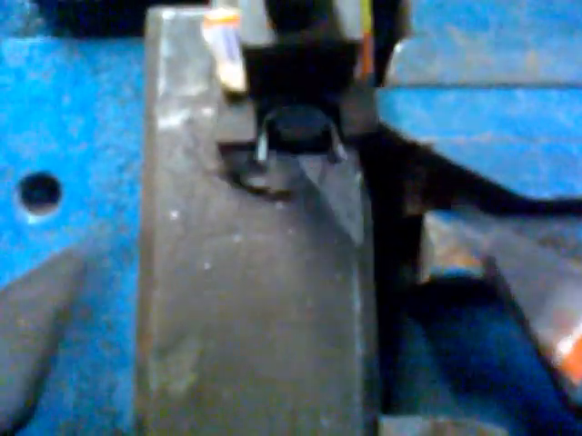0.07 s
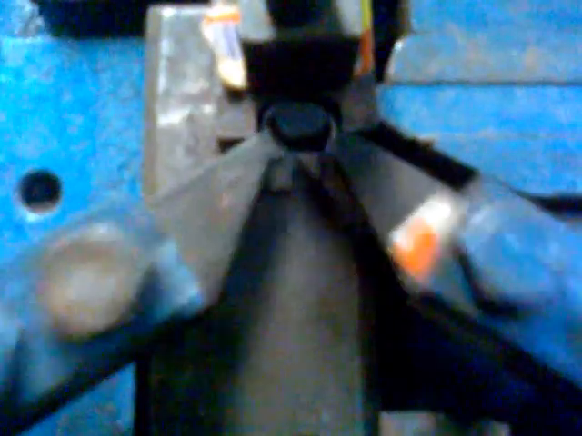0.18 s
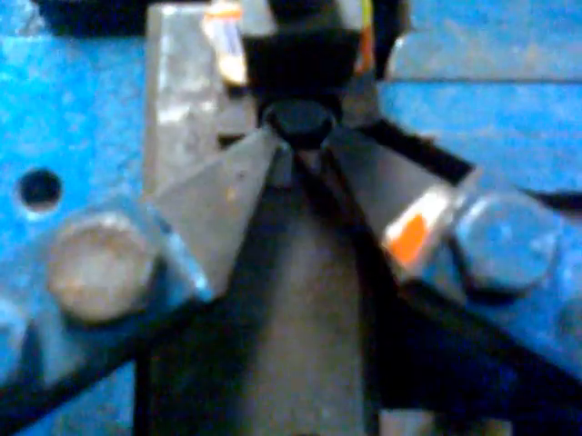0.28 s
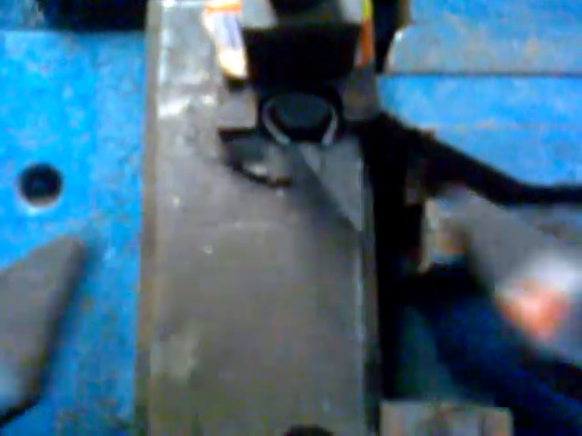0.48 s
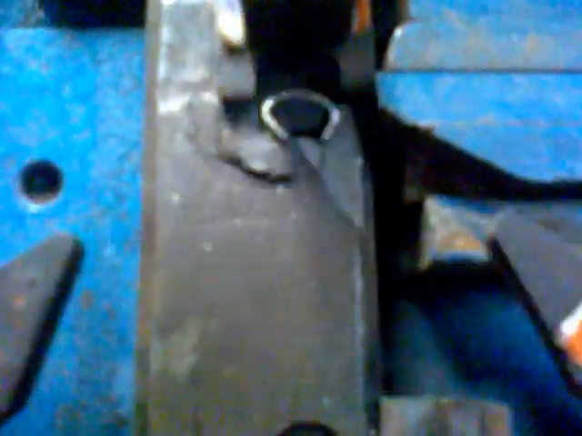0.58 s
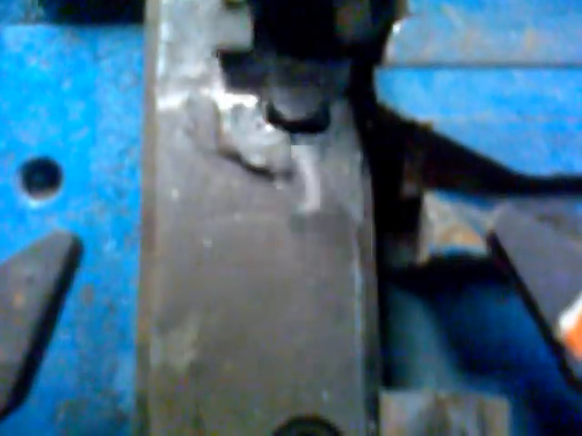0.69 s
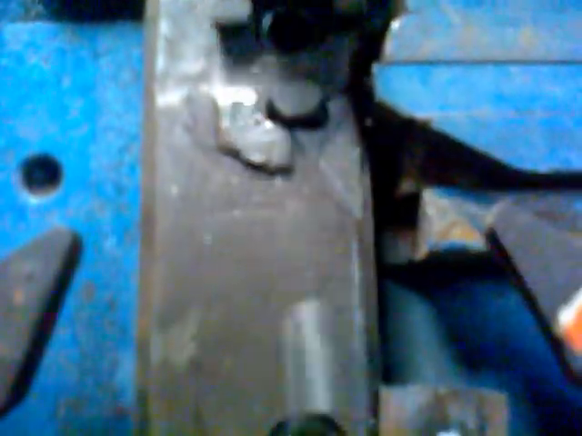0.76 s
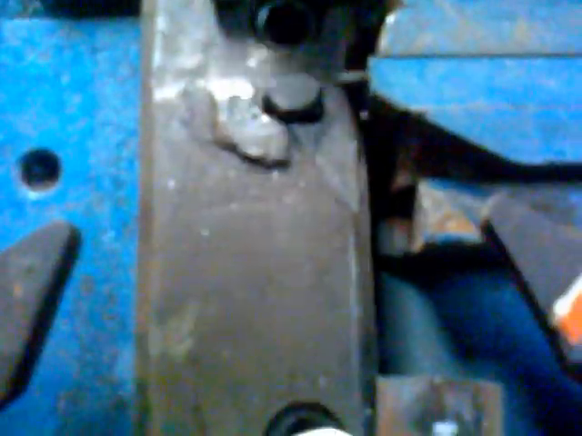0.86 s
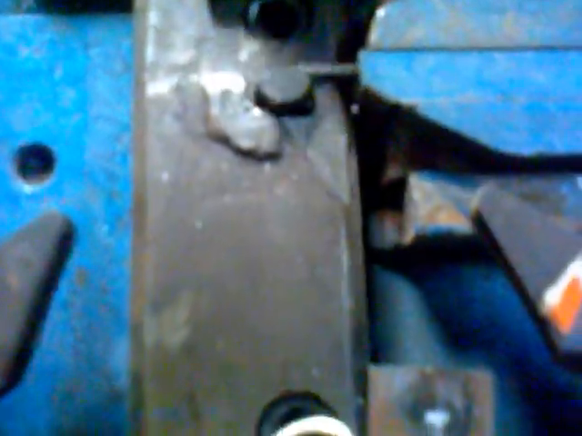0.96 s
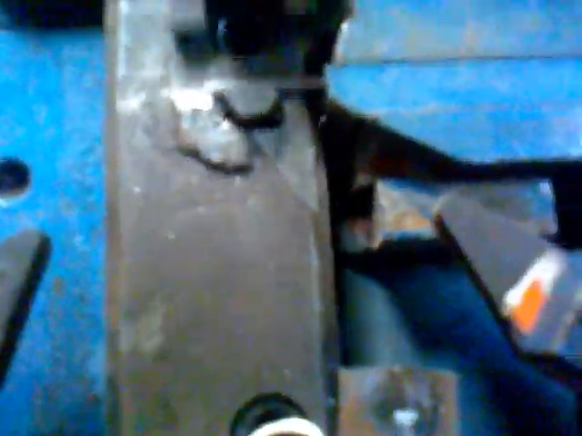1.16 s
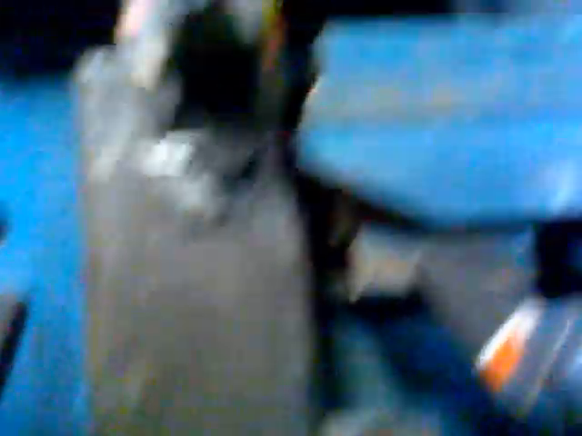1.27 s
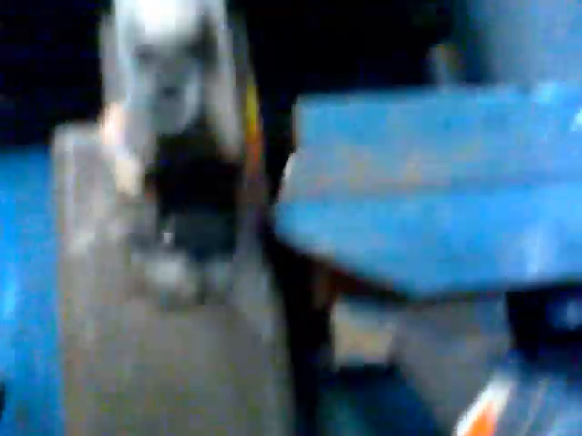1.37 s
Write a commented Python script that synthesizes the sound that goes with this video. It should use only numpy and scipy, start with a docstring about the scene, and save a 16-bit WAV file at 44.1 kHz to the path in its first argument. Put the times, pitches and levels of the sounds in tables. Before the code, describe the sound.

A wire forming machine runs through one cycle, very close: light ticks, a crashing volley of steel clanks, a second clattering volley with short pings, then a faint wire hiss and dull knock in a workshop.

```python
"""In a workshop, very close to a cam-driven wire forming machine, one working cycle is heard.
Steel slides and bending arms clank shut in one volley and let go in a second: bursts of many fading tones.
Small parts ping as paired sine tones, the frame rings in longer ones, and coloured noise is the drive under load.
The wire slides on with a gliding hiss, a dull low knock follows, and the loudest blows overload the microphone."""
import sys
import numpy as np
from scipy import signal
from scipy.fft import rfft, irfft
from scipy.io import wavfile
from scipy.ndimage import uniform_filter1d

SR = 44100
rng = np.random.default_rng(int(sys.argv[2]) if len(sys.argv) > 2 else 0)


def file_out(sig):
    """Save sig as 16-bit WAV at sys.argv[1]."""
    # one column per channel
    cols = np.atleast_2d(sig).T
    # limit, then scale
    lim = np.clip(cols, -1, 1)
    pcm = np.round(lim * 32767).astype(np.int16)
    wavfile.write(sys.argv[1], SR, pcm)


N = 63945  # length in samples

# Noise of the running drive. Each row: frequency in Hz, relative strength in dB per Hz.
DRIVE_COLOUR = [(25, -14.5), (55, -3.5), (90, 1), (150, -8.5), (260, 0.5), (470, -9), (640, -1),
                (800, -8.5), (1500, -9), (2800, -19.5), (4000, -22.5), (7000, -39), (15500, -40.5)]
# How hard the machine works. Each row: time in seconds, change of drive level in dB.
LOAD_CURVE = [(0, -2.5), (.13, -2), (.3, 19.5), (.43, 1), (.5, 11.5), (.56, 7), (.8, 13), (.95, 3.5),
              (1.07, -0.5), (1.16, -3.5), (1.35, -4), (1.45, 4)]
DRIVE_DB, RATTLE_DB = -43.5, 2  # level before the load is added; depth of the random flutter

# Low shaking of the machine's body. Each row: frequency in Hz, relative strength in dB per Hz.
RUMBLE_COLOUR = [(18, -23), (35, -9), (52, 1), (85, -2), (130, -10.5), (300, -44)]
# How strongly the body shakes. Each row: time in seconds, rumble level in dB.
SHAKE_CURVE = [(0, -55), (.15, -56), (.22, -56), (.38, -28), (.47, -39.5), (.65, -44.5), (.78, -42.5),
               (.92, -43.5), (1.15, -58.5), (1.38, -52), (1.42, -43), (1.45, -50)]

# Resonances of the gear housing. Each row: frequency in Hz, width in Hz, level in dB before the load is added.
GEAR_TONES = [(604.7, 36, -49), (677, 55, -49), (1444, 90, -58.5)]
GEAR_LOAD_SHARE = 0.87  # dB of gear level per dB of load

# Sound of a cam follower's tap. Each row: frequency in Hz, relative strength in dB per Hz.
TAP_COLOUR = [(100, -23), (250, -1), (650, 2), (1500, -1.5), (2800, -14.5), (4000, -12.5), (8000, -33.5),
              (16000, -45.5)]
TAPS_PER_S, TAP_DB, TAP_SPREAD_DB, TAP_RING_S = 40, -49.5, 3.5, 0.025  # level before the load is added

# Steel striking steel. Each row: start in seconds, level in dB, then bass, edge and fizz in dB
# relative to that level, and ring time (60 dB fade) in seconds at the second colour frequency.
BLOWS = [ (.036, -34, 0, -1.5, -3, 0.028), (.067, -29, 16, -22, -17, 0.035), (.150, -29, -4, -19, -12, .03),
         (.161, -14, -4, -11.5, -29, 0.021), (0.178, -25.5, 11, -3, 2, 0.06), (.199, -22, 4, 5, 6, 0.046),
         (.206, -2.5, 6.5, 5.5, 8.5, .035), (.276, -8.5, 1, -7.5, -17, 0.063),
         (.2865, -4, 1, -1.5, -11, 0.023), (.289, -1.5, -0.5, 2, 7.5, 0.02),
         (0.311, -13, -3.5, -1, -21.5, .04), (.3142, -11, -2.5, -6, -11, 0.052),
         (0.3308, -4, -3, 0.5, -3.5, 0.044), (.352, -14, 3, 0.5, -22, 0.027),
         (0.3609, -4.5, -14, 1, -14, 0.031), (.3655, -3, -19, 4.5, 6, 0.033),
         (0.3796, -2.5, -2, 6, 1, 0.036), (.389, -11, 2, 5.5, -14, 0.057),
         (.398, -20.5, -7, 13, -7.5, 0.047), (0.496, -23, -0.5, -10, -13, .06),
         (.548, -27, -10, 4, -17, 0.028), (.573, -5, -7, 8, -4, 0.062), (.579, -6.5, 0, 5, 2, 0.021),
         (.588, -9, -7, 7, -3.5, 0.046), (.596, -5, -7.5, 1, -9, 0.043), (.601, -3.5, -1.5, -3, 1, 0.027),
         (.619, -7.5, -4, 10.5, -2.5, 0.049), (.629, -16.5, 1.5, -0.5, -0.5, 0.069),
         (0.653, -19, -10.5, -22, -11, 0.11), (.684, -4.5, -15.5, 2.5, -20, 0.053),
         (0.707, -9, -11, 7, 7.5, .04), (0.7221, -7, -17, 2, -5.5, 0.026), (.732, -4, -13.5, 5.5, 0.5, .05),
         (.740, -5.5, -5.5, 8.5, 0.5, 0.053), (0.789, -22.5, 17, 9.5, 26.5, 0.012),
         (.820, -18, 2, -10, -7, 0.038), (.849, -19, -2, -2.5, 0, 0.034), (0.86, -31, -4, 3.5, 18.5, .05),
         (.889, -27, -12, 8, 7, 0.057), (.963, -24.5, 3.5, -17, -21.5, 0.027),
         (.983, -28.5, 5, -18, -12, 0.034), (1.004, -50, -5, 10, 28.5, 0.17),
         (1.222, -45.5, 7, 8, -6.5, 0.037), (1.408, -35, -1, -0.5, 9, 0.037),
         (1.416, -34.5, 1, 6.5, 12, 0.017), (1.432, -33.5, 1.5, -11, -9, 0.057),
         (1.442, -31.5, 3, 6, 8.5, 0.019)]
# Sound of the steel parts. Each row: frequency in Hz, relative strength in dB per Hz.
STEEL_COLOUR = [(60, -30), (140, -22), (200, -4), (450, -3), (680, -1.5), (1000, 0.5), (1900, 0),
                (2750, -9), (3600, -6.5), (5200, -14), (8000, -22), (11000, -26.5), (16000, -39.5)]
# Where a blow's colour is set. The entries, in Hz: bass, the unchanged middle, edge, fizz.
BLOW_COLOUR_HZ = [220, 1300, 5000, 10000]
ATTACK_S, TREBLE_DAMPING = 0.00026, 0.17  # ring time falls as this power of frequency

# Sound of loose links and pins. Each row: frequency in Hz, relative strength in dB per Hz.
CHATTER_COLOUR = [(200, -13.5), (900, -1), (2000, 3), (2800, 5), (4000, -5), (7000, -11), (11000, -20),
                  (16000, -29)]
CHATTER_PER_S, CHATTER_DB, CHATTER_SPREAD_DB = 260, -16, 3.5  # level relative to the shaking
CHATTER_FADE_S, CHATTER_RING_S = 0.01, 0.014  # memory of the shaking; 60 dB fade of a tick

# Ringing modes of the frame. Each row: frequency in Hz, relative level in dB, 60 dB fade in seconds.
FRAME_MODES = [(219.8, -26.5, 0.16), (544.8, -21.5, .2), (587, -39.5, 0.82), (668.6, -27.5, 0.51),
               (829, -19.5, 0.2), (980, -23, 0.122), (1160, -27.5, 0.23), (1295, -21, 0.14),
               (1489, -25.5, 0.22), (1707, -25, .17), (2033, -20.5, .18), (3387, -29.5, 0.16),
               (3880, -21.5, 0.1), (5020, -33, 0.18)]
FRAME_DB = -3  # added to every mode's level, along with the blow's

# How long the room rings. Each row: frequency in Hz, 60 dB fade in seconds.
ROOM_FADE = [(100, .5), (500, 0.42), (1500, 0.54), (4000, .42), (8000, .36), (15000, 0.39)]
# How strongly the room answers. Each row: frequency in Hz, level in dB.
ROOM_LEVEL = [(100, -9), (600, -11.5), (1500, -18), (4000, -22), (12000, -19)]
PING_ROOM_DB = -0.5  # how much of the pings reaches the room

# Single parts ringing after a blow. Each row: start in seconds, pitch in Hz, level in dB,
# 60 dB fade in seconds, level change at the next contact in dB (only negative values act).
PING_PARTS = [(0.2045, 6330, -25, 0.1, 0), (.207, 967, -6, 0.069, 0), (.208, 218, -19, 0.13, 0),
              (.2865, 860, -7, 0.032, 0), (0.319, 3750, -14, 0.036, 0), (0.331, 6190, -3.5, 0.013, 0),
              (.3715, 3474, 6, 0.025, 1.5), (.573, 5120, -8, 0.043, 0), (.574, 1325, -5, 0.072, 0),
              (.574, 3360, -1.5, 0.029, 0), (.582, 4600, -12, 0.071, 0), (.619, 4820, -5, 0.025, 0),
              (.6375, 3740, -10.5, 0.022, 0), (.684, 6030, -11, 0.026, 0), (0.7056, 3432, 4, 0.072, -11.5),
              (.742, 3490, -10, 0.06, 0), (.742, 5230, -17.5, .06, 0), (.742, 10920, -31, .08, 0),
              (.796, 3430, -14.5, 0.065, 0), (.796, 8340, -25, .05, -2), (1.4415, 2375, -21.5, 0.011, 0)]
PING_RISE_S, TWIN_SHARE, TWIN_DB = 0.0012, 0.021, -10.5  # the weaker twin lies this share below the pitch
PING_FREE_S, PING_CATCH_S = 0.0071, 0.00046  # free ringing before contact; softness of the catch

SLIDE_S, SLIDE_LENGTH_S, SLIDE_DB = 0.991, 0.15, -52.5
SLIDE_FROM_HZ, SLIDE_TO_HZ, SLIDE_WIDTH_HZ = 4800, 3700, 710

KNOCK_S, KNOCK_HZ, KNOCK_DB, KNOCK_SWELL_S = 1.4078, 550, -14, 0.00067  # swell peaks after twice this time

CLIP_KNEE, EDGE_HZ = 4, 15900  # sharpness of the overload; top of the microphone's band


def amp(db):
    """Turns decibels into a gain."""
    return 10 ** (np.asarray(db) / 20)


def evened(x):
    """Scales a signal to an rms (average strength) of one."""
    return x / np.sqrt(np.mean(x ** 2) + 1e-20)


def read(points, hz):
    """Reads a table between its rows, on a log-frequency axis."""
    f, value = np.transpose(points)
    return np.interp(np.log(hz + 1), np.log(f + 1), value)


def curve(points):
    """Reads a table over time at every sample."""
    return np.interp(np.arange(N) / SR, *np.transpose(points))


def add(mix, s, sound):
    """Mixes a sound in, starting at the given second."""
    part = mix[max(round(s * SR), 0):][:len(sound)]
    part += sound[:len(part)]


def noise(spectrum):
    """Makes steady noise of a given colour."""
    gain = amp(read(spectrum, np.fft.rfftfreq(N, 1 / SR)))
    return evened(irfft(rfft(rng.standard_normal(N)) * gain, N))


def dense_ring(gain, t60_of, count=8):
    """Adds up very many modes of random phase, each band dying at its own speed."""
    size = 2 * (len(gain) - 1)
    hz, t = np.fft.rfftfreq(size, 1 / SR), np.arange(size) / SR
    centres = np.geomspace(120, 14000, count)
    modes = gain * np.exp(2j * np.pi * rng.random(len(gain))) * np.sqrt(size)
    ring = np.zeros(size)
    for centre, share in zip(centres, np.eye(count)):
        # Neighbouring bands cross-fade into each other
        band = irfft(modes * read(np.c_[centres, share], hz))
        ring += band * np.exp(-np.log(1000) * t / t60_of(centre))
    return ring


def resonance(hz, width):
    """Makes noise ring in one resonance, at a fixed or gliding frequency."""
    r = np.exp(-np.pi * width / SR)
    grain = rng.standard_normal(N) + 1j * rng.standard_normal(N)
    wavering = signal.lfilter([1], np.poly([r, r]), grain)
    tone = np.exp(2j * np.pi * np.cumsum(hz * np.ones(N)) / SR)
    return evened((wavering * tone).real)


def random_ticks(spectrum, per_s, spread_db, ring_s, count, size=2048):
    """Scatters small contacts at random among several parts, each with its own short ring."""
    colour, out = amp(read(spectrum, np.fft.rfftfreq(size, 1 / SR))), np.zeros(N)
    for _ in range(count):
        hits = rng.random(N) < per_s / count / SR
        strengths = amp(spread_db * rng.standard_normal(N))
        out += signal.oaconvolve(hits * strengths, dense_ring(colour, lambda f: ring_s))[:N]
    return evened(out)


def drive():
    """Cams and gears churn and rattle, louder under load, while the machine's body shakes."""
    rattle = evened(uniform_filter1d(rng.standard_normal(N), size=260))  # random flutter
    churn = noise(DRIVE_COLOUR) * amp(DRIVE_DB + curve(LOAD_CURVE) + RATTLE_DB * rattle)
    rumble = noise(RUMBLE_COLOUR) * amp(curve(SHAKE_CURVE))
    return churn + rumble


def gears():
    """The gear housing's resonances sing with a wavering tone that swells under load."""
    tones = sum(amp(db) * resonance(hz, width) for hz, width, db in GEAR_TONES)
    return amp(GEAR_LOAD_SHARE * curve(LOAD_CURVE)) * tones


def followers():
    """The cam followers tap unevenly all through the cycle, louder under load."""
    taps = random_ticks(TAP_COLOUR, TAPS_PER_S, TAP_SPREAD_DB, TAP_RING_S, count=5)
    return amp(TAP_DB + curve(LOAD_CURVE)) * taps


def clanks(size=8192):
    """Each blow sets the heavy steel parts ringing briefly in very many modes."""
    hz, t, out = np.fft.rfftfreq(size, 1 / SR), np.arange(size) / SR, np.zeros(N)
    steel = evened(amp(read(STEEL_COLOUR, hz)))
    attack = np.minimum(t / ATTACK_S, 1)
    for s, db, bass, edge, fizz, t60 in BLOWS:
        colour = amp(read(np.c_[BLOW_COLOUR_HZ, [bass, 0, edge, fizz]], hz))
        ring = dense_ring(steel * colour, lambda f: t60 * (BLOW_COLOUR_HZ[1] / f) ** TREBLE_DAMPING)
        add(out, s, amp(db) * attack * ring)
    return out


def chatter(struck):
    """Loose links and pins tick at random while the machine is still shaking from a blow."""
    r = np.exp(-1 / (CHATTER_FADE_S * SR))
    shaking = np.sqrt(signal.lfilter([1 - r], [1, -r], struck ** 2))
    ticks = random_ticks(CHATTER_COLOUR, CHATTER_PER_S, CHATTER_SPREAD_DB, CHATTER_RING_S, count=6)
    return amp(CHATTER_DB) * shaking * ticks


def frame():
    """The frame's longer modes answer every blow, each with a random starting phase."""
    t, out = np.arange(N) / SR, np.zeros(N)
    modes = np.array([amp(db) * np.exp((2j * np.pi * hz - np.log(1000) / t60) * t)
                      for hz, db, t60 in FRAME_MODES])
    for s, db, *_ in BLOWS:
        phases = np.exp(2j * np.pi * rng.random(len(FRAME_MODES)))
        add(out, s, amp(db + FRAME_DB) * (phases @ modes).real)
    return out


def workshop(x, size=32768):
    """The room answers with a diffuse tail that fades at a different speed in each band."""
    hz = np.fft.rfftfreq(size, 1 / SR)
    tail = dense_ring(np.ones(len(hz)), lambda f: read(ROOM_FADE, f))
    tail = irfft(rfft(tail / np.linalg.norm(tail)) * amp(read(ROOM_LEVEL, hz)))
    # Drop the end, where the colouring wraps around
    return signal.fftconvolve(x, tail[:size - size // 10])[:N]


def pings(size=8192):
    """Steel parts ring with a beating pair of modes; renewed contact damps some of them."""
    t, out = np.arange(size) / SR, np.zeros(N)
    contact = (1 + np.tanh((t - PING_FREE_S) / PING_CATCH_S)) / 2
    rise = np.minimum(t / PING_RISE_S, 1)
    for s, hz, db, t60, drop_db in PING_PARTS:
        twin = amp(TWIN_DB) * np.sin(2 * np.pi * hz * (1 - TWIN_SHARE) * t)
        pair = np.sin(2 * np.pi * hz * t) + twin
        level = amp(db + min(drop_db, 0) * contact)
        add(out, s, level * rise * np.exp(-np.log(1000) * t / t60) * pair)
    return out


def wire_slide():
    """The wire scrapes through its guide: a faint resonant hiss that glides down."""
    progress = np.clip((np.arange(N) / SR - SLIDE_S) / SLIDE_LENGTH_S, 0, 1)
    glide_hz = SLIDE_FROM_HZ + (SLIDE_TO_HZ - SLIDE_FROM_HZ) * progress
    return amp(SLIDE_DB) * np.sin(np.pi * progress) * resonance(glide_hz, SLIDE_WIDTH_HZ)


def knock(size=2048):
    """A soft blow on the housing gives a few low cycles and no ring."""
    t, out = np.arange(size) / SR, np.zeros(N)
    u = t / KNOCK_SWELL_S
    swell = (u / 2) ** 2 * np.exp(2 - u)
    add(out, KNOCK_S, -amp(KNOCK_DB) * swell * np.sin(2 * np.pi * KNOCK_HZ * t))
    return out


def scene():
    """The machine at work, with the room answering its blows and pings."""
    struck, rings = clanks(), pings()
    blows = struck + chatter(struck) + frame() + knock()
    room = workshop(blows + amp(PING_ROOM_DB) * rings)
    running = drive() + followers() + gears() + wire_slide()
    return (blows + rings + room + running)[None]


def record(dry):
    """The microphone squashes the loudest peaks, then the highest treble is cut off."""
    clipped = dry / (1 + np.abs(dry) ** CLIP_KNEE) ** (1 / CLIP_KNEE)
    lowpass = signal.firwin(511, EDGE_HZ, window=("kaiser", 9), fs=SR)
    return signal.oaconvolve(clipped, lowpass[None], "same")


dry = scene()
out = record(dry)
file_out(out)
```